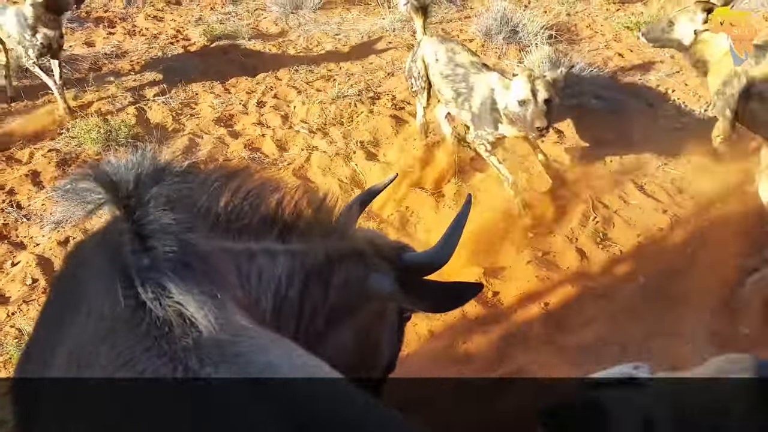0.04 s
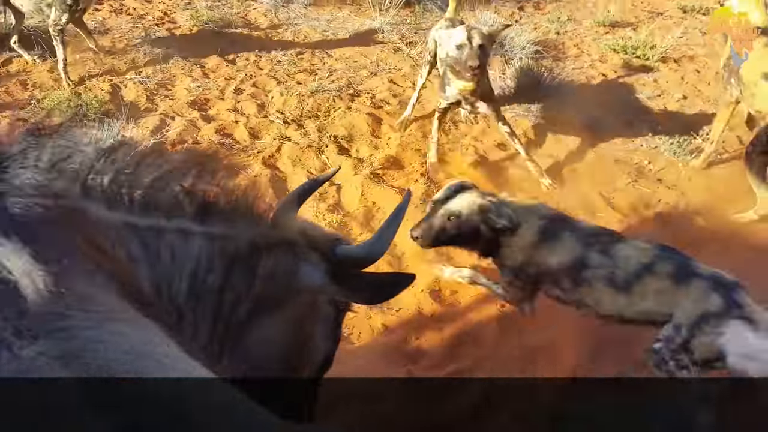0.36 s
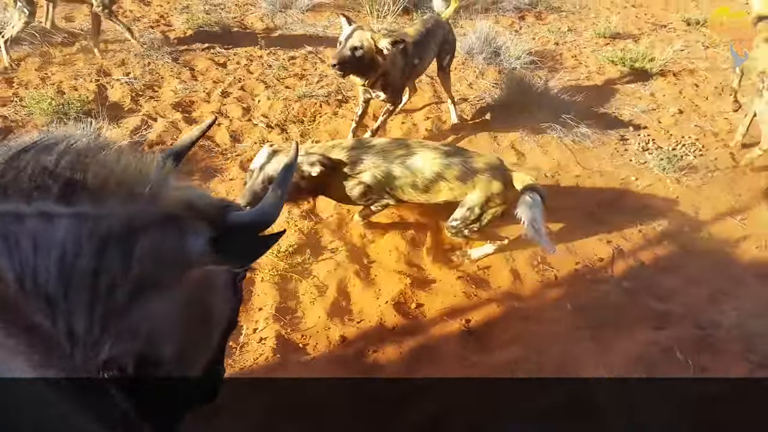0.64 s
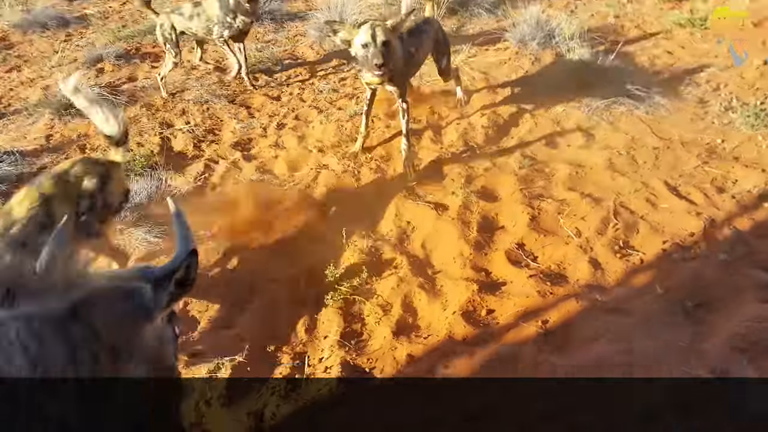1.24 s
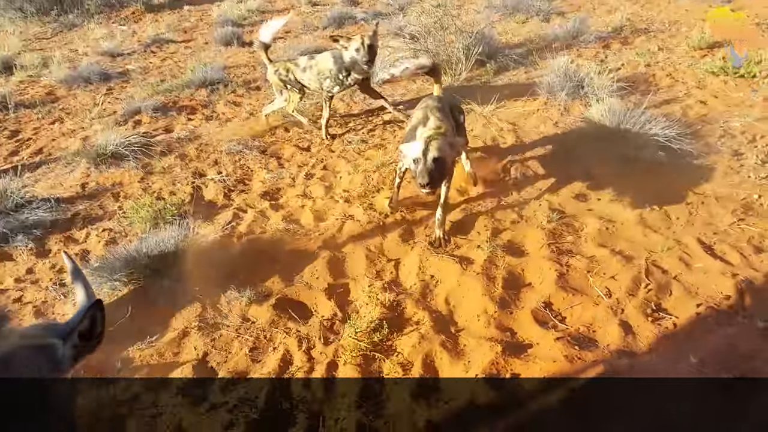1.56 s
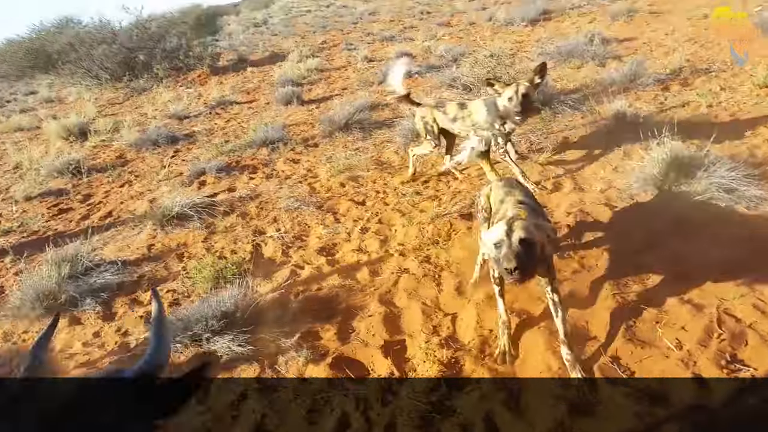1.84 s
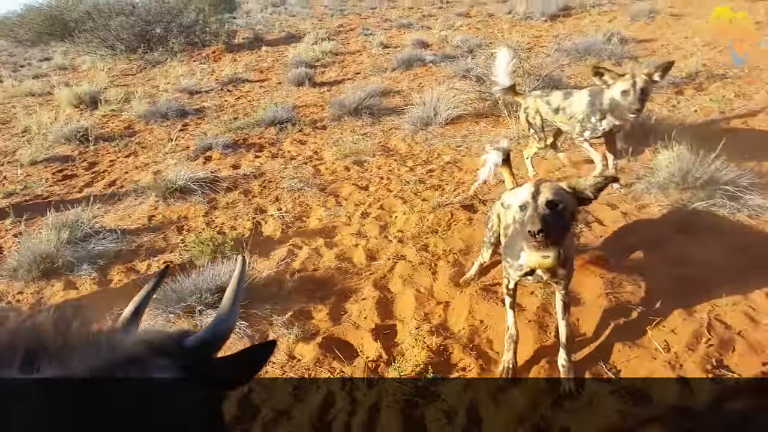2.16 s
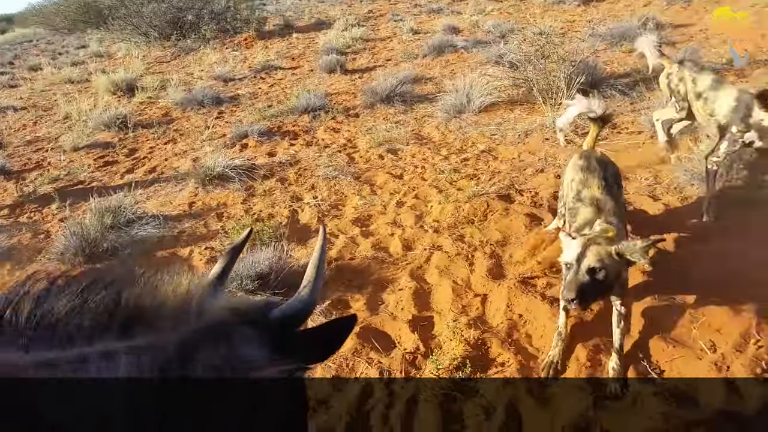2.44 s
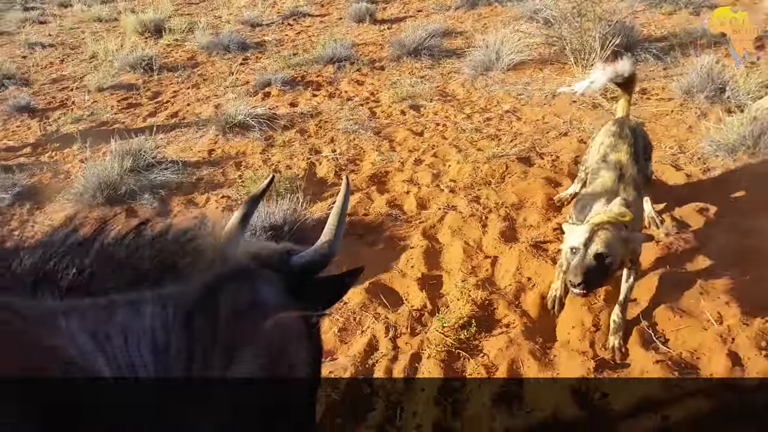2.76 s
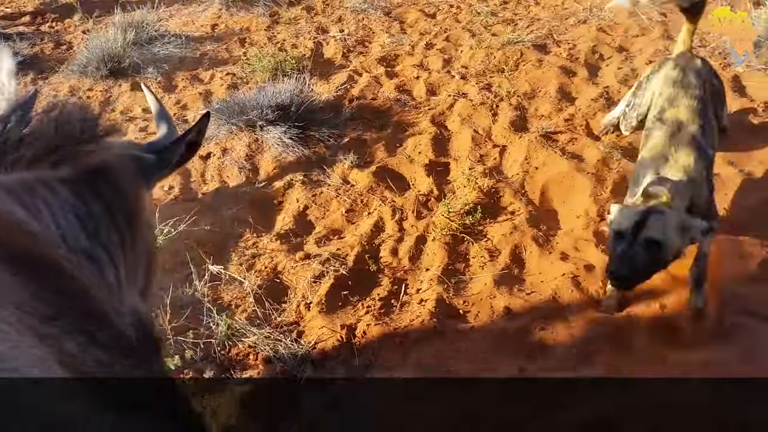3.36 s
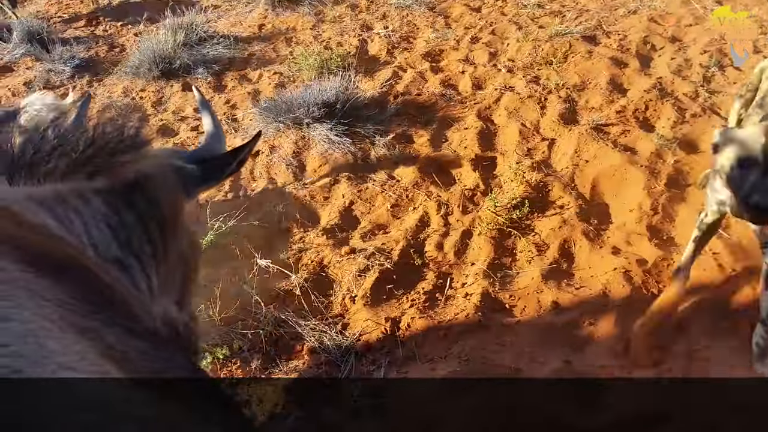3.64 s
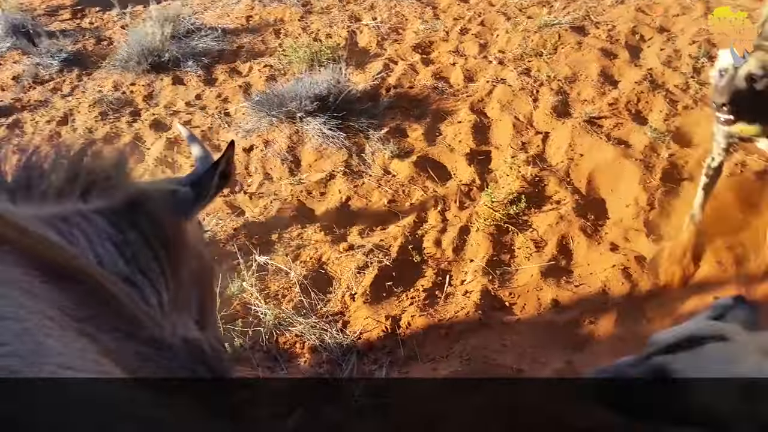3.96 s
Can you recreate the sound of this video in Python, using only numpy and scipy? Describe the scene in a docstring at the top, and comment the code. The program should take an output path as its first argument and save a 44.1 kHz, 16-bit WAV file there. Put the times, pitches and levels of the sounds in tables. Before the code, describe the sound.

Wild dogs twitter close by in rapid, very high squeaks and short yips.

```python
"""On open sand, excited painted dogs twitter close to the microphone.
Each syllable has two voices at once: a whistle that dips, leaps to a very high arch and drops back,
and a short falling yip from the vocal folds. Rattling throat grunts and thin whistles fill the gaps,
other dogs whine farther off, and a faint wind lies under it all."""
import sys
import numpy as np
from scipy import signal
from scipy.fft import rfft, irfft
from scipy.io import wavfile
from scipy.ndimage import uniform_filter1d

SR = 44100
rng = np.random.default_rng(int(sys.argv[2]) if len(sys.argv) > 2 else 0)


def log_audio(samples):
    """Write samples as a 16-bit WAV file to the path given in sys.argv[1]."""
    # one column per channel
    frames = np.atleast_2d(samples).T
    # limit to full scale, then quantise
    limited = np.clip(frames, -1, 1)
    pcm = np.round(limited * 32767).astype(np.int16)
    wavfile.write(sys.argv[1], SR, pcm)


N = 176400

TOP_HZ = 15750  # the recorder's upper limit
FAR_RIGHT_DB, RIGHT_DB = -28, -7  # pan: left level minus right level


def undb(db):
    return 10 ** (np.asarray(db) / 20)


def unit(x):
    return x / np.sqrt(np.mean(x ** 2) + 1e-18)


def wobble(n, hz):
    """A random wander of about plus or minus 1 that turns hz times a second."""
    steps = np.arange(n) * hz / SR
    return 1.2 * np.interp(steps, np.arange(8192), rng.standard_normal(8192))


def colour(x, points):
    """Shape the tone along a (Hz, dB) curve, then set the average power to 1."""
    hz, db = np.array(points).T
    f = np.maximum(np.arange(len(x) // 2 + 1) * SR / len(x), 1)
    return unit(irfft(rfft(x) * undb(np.interp(np.log(f), np.log(hz), db)), len(x)))


def gate(t, length, attack_s, release_s):
    """Fade in, hold, fade out."""
    rise = np.clip(t / attack_s + .5, 0, 1)
    fall = np.clip((length - t) / release_s + .5, 0, 1)
    return np.sin(np.pi / 2 * rise * fall) ** 2


def pan(x, db):
    """Place a sound to the left (positive dB) or right (negative dB)."""
    g = undb(db)
    return np.array([g * x, x]) * np.sqrt(2 / (1 + g ** 2))


def add(out, start, x):
    """Mix x in at a start time in seconds."""
    i = int(round(start * SR))
    a, b = max(i, 0), min(i + x.shape[-1], N)
    if b > a:
        out[..., a:b] += x[..., a - i:b - i]


def span(length):
    """The times of a call, with 10 ms to spare on both sides."""
    return np.arange(-SR // 100, int(length * SR) + SR // 100) / SR


def phase_of(hz):
    return 2 * np.pi * np.cumsum(hz) / SR


# The tone of the wind. Each row: frequency in Hz, relative level in dB.
WIND_TONE = [(15, -29), (25, -15), (82, 16), (970, -6), (1530, -5), (3930, -15.5), (5730, -18),
             (8580, -4.5), (12200, -6), (15500, -34.5)]


def wind(level_db=-51.5, gust_db=1.5):
    """Faint moving air and distant hiss, partly shared by both sides."""
    shared = rng.standard_normal(N)
    air = np.array([colour(shared + 0.5 * rng.standard_normal(N), WIND_TONE) for _ in range(2)])
    return air * undb(level_db + gust_db * wobble(N, 4.47))


# Twitters: a lead-in, a high arch, a tail. Each row: time of the leap in seconds, arch length in
# seconds, arch top in Hz, arch level in dB, arch pan in dB, lead-in length in seconds, its starting
# pitch in Hz, its level in dB, tail length in seconds, tail level in dB.
SYLLABLES = [(0.086, 0.033, 15240, -18.5, 1, 0.019, 8600, -24, 0.043, -26),
             (0.21, 0.037, 14900, -21.5, 10, 0.04, 9000, -22.5, 0.026, -26.5),
             (0.62, 0.029, 14100, -19.5, 6, 0.029, 9500, -24, 0.026, -26.5),
             (0.718, 0.028, 14900, -23.5, 12, 0.039, 8200, -21.5, 0.034, -23),
             (0.783, 0.039, 14200, -28, 6, 0.0086, 7750, -25, 0.0033, -15.5),
             (1.049, 0.04, 15200, -19, 8, 0.032, 7720, -32, 0.0053, -37),
             (1.138, 0.041, 15430, -19.5, 10, 0.017, 7970, -19.5, 0.042, -23.5),
             (1.254, 0.032, 15250, -18, 11, 0.043, 9300, -18, 0.048, -21.5),
             (1.38, 0.046, 13400, -17, 0, 0.036, 9400, -19, 0.021, -30.5),
             (1.591, 0.039, 15170, -16.5, 9, 0.018, 8220, -25, 0.03, -21),
             (1.696, 0.043, 15300, -26, 14, 0.041, 7860, -21, 0.036, -22),
             (1.812, 0.035, 15100, -18, 5, 0.035, 8930, -17.5, 0.014, -25),
             (2.082, 0.036, 15100, -20, 2, 0.017, 8150, -29.5, 0.028, -23.5),
             (2.191, 0.05, 15500, -23.5, 10, 0.039, 9740, -19, 0.02, -22.5),
             (2.305, 0.055, 16400, -24.5, 15, 0.041, 9300, -20, 0.012, -38.5),
             (2.538, 0.041, 15250, -21.5, 10, 0.015, 8530, -25.5, 0.028, -23.5),
             (2.655, 0.039, 14540, -23, 12, 0.041, 9300, -20, 0.025, -22.5),
             (2.769, 0.04, 14960, -18, 10, 0.03, 9060, -19, 0.0089, -25),
             (2.874, 0.039, 15200, -25, 8, 0.009, 8000, -67, 0.0068, -33),
             (2.979, 0.0356, 15750, -20.5, 14, 0.0196, 7730, -18, 0.053, -21),
             (3.091, 0.036, 15800, -26, 17, 0.012, 7300, -25, 0.015, -21),
             (3.207, 0.056, 15300, -19.5, 11, 0.022, 8670, -20.5, 0.011, -30.5),
             (3.341, 0.028, 13800, -30, 6, 0.0086, 8000, -63, 0.011, -35),
             (3.437, 0.036, 15040, -20.5, 14, 0.021, 7960, -19, 0.041, -24),
             (3.544, 0.041, 15500, -22.5, 6, 0.036, 9000, -23, 0.043, -24),
             (3.671, 0.037, 12800, -24.5, -7, 0.028, 8820, -17.5, 0.018, -33),
             (3.778, 0.03, 14000, -26, 6, 0.011, 8000, -33.5, 0.03, -39),
             (3.891, 0.048, 15350, -16.5, 5, 0.016, 8160, -23.5, 0.045, -24),
             (3.994, 0.058, 15200, -20, 1, 0.027, 7380, -20, 0.01, -29)]
# The low throat rumble and breathy hiss that go with a twitter.
# Each row: frequency in Hz, relative level in dB.
RUMBLE_AND_BREATH = [(30, -40), (95, 8.5), (320, 4), (520, -7), (1400, 3), (2500, -4), (4000, -11.5),
                     (6200, -13.5), (7500, 2.5), (10500, -6), (15000, 3.5)]


def twitters(folds, dip_hz=7224, tail_hz=7457, dip_s=0.00678, leap_s=0.00845, shoulder=0.89):
    """A raspy whistle dips, leaps, arches and drops. The yip's vocal folds shake its high part."""
    low, high, effort = np.zeros((2, N)), np.zeros((2, N)), np.zeros(N)
    for leap, arch, top_hz, arch_db, arch_pan, lead, lead_hz, lead_db, tail, tail_db in SYLLABLES:
        t = span(lead + arch + tail) - lead  # zero at the leap
        n = len(t)
        first_half = t < arch / 2
        dip = dip_hz + (lead_hz - dip_hz) * np.clip((-t - dip_s) / max(lead - dip_s, .008), 0, 1) ** 2
        crest = top_hz * (1 - (1 - shoulder) * np.minimum((2 * t / arch - 1) ** 2, 2))
        # 0 on the low note, 1 on the arch
        up = (1 + np.tanh(2 * t / leap_s)) * (1 + np.tanh(2 * (arch - t) / leap_s)) / 4
        hz = np.where(first_half, dip, tail_hz) * (1 - up) + crest * up
        waver = 0.0159 * wobble(n, 820) + .02 * wobble(n, 170)
        arch_jitter = .06 * rng.random() * up * wobble(n, 1500)
        phase = phase_of(hz * (1 + waver + arch_jitter))
        rasp = wobble(n, 1900) * np.sin(phase) + wobble(n, 1800) * np.cos(phase)
        tone = np.sin(phase) + .38 * (.5 + up / 2) * rasp

        fade = np.sqrt(2) * gate(t + lead, lead + arch + tail, 0.003, 0.012)
        flutter = 1.5 * np.tanh(wobble(n, 287.5))
        drop_db = -6.5 * (t > arch / 2)  # quieter on the way down
        low_db = np.where(first_half, lead_db, tail_db) + drop_db * up
        low_level = fade * (1 - up ** 2) * undb(low_db) * unit(undb(6 * flutter))
        high_level = fade * up ** 2 * undb(arch_db + drop_db * (1.5 - up)) * unit(undb(3.5 * flutter))

        octave = low_level * undb(-6.5) * np.sin(2 * phase) * np.clip((9000 - hz) / 1000, 0, 1)
        crack = np.clip(wobble(n, 80), 0, 2) * (1 - up) ** 4  # now and then a lower tone breaks in
        undertone = low_level * undb(-16) * np.sin(phase * 2 / 3) * crack
        low_voice = pan(low_level * tone, FAR_RIGHT_DB) + pan(octave, arch_pan)
        add(low, leap + t[0], low_voice + pan(undertone, RIGHT_DB))
        add(high, leap + t[0], pan(high_level * tone, arch_pan))
        add(effort, leap + t[0], uniform_filter1d(low_level + 0.18 * high_level, size=200))
    rumble_and_breath = np.array([colour(rng.standard_normal(N), RUMBLE_AND_BREATH) for _ in range(2)])
    return low + high * (1 + 2 * undb(-5) * folds) + undb(-9.5) * effort * rumble_and_breath


# Yips. Each row: start in seconds, length in seconds, first and last pitch in Hz, relative level in dB,
# then the levels of the overtones and of the in-between tones, in dB compared with the main tone.
YIP_CALLS = [(0.104, 0.037, 1356, 822, -25.5, -10.5, -12.5), (.985, 0.02, 1383, 1225, -42, 7, -9),
             (0.187, 0.067, 1032, 872, -25, -17.5, -7), (0.269, 0.049, 945, 956, -24.5, -12, -4),
             (0.364, 0.032, 914, 903, -23, -13, -6), (0.677, 0.034, 1003, 930, -23, -34, -21),
             (0.715, 0.037, 1112, 907, -23, -5, -27), (0.789, 0.025, 948, 930, -21, -17.5, -9),
             (1.064, 0.021, 1289, 1065, -21, -4.5, -10), (1.134, 0.041, 1191, 936, -21.5, -7, -6),
             (1.255, 0.038, 1260, 863, -28, 2.5, -3), (1.378, 0.037, 1074, 982, -26, -0.5, -32),
             (1.604, 0.027, 1616, 1154, -28.5, -5, -22), (1.698, 0.048, 1258, 890, -27, -3, -36),
             (1.809, 0.044, 1189, 883, -25.5, -3.5, -22.5), (2.195, 0.039, 1111, 915, -27.5, -3, -19.5),
             (2.306, 0.036, 1340, 980, -24.5, -4.5, -19.5), (2.662, 0.039, 1233, 914, -33, -1.5, -24),
             (2.769, 0.048, 1159, 830, -34.5, -2, -29), (2.865, 0.043, 1130, 1030, -42.5, 1, 9),
             (2.988, 0.028, 1707, 1245, -26, 2.5, -14), (3.077, 0.056, 1300, 837, -25.5, -0.5, -28),
             (3.21, 0.044, 1130, 856, -28, -4, -51), (3.336, 0.031, 1269, 1070, -30, -1, -7),
             (3.435, 0.11, 1069, 1110, -33.5, -5.5, -8), (3.44, 0.038, 1443, 808, -30.5, -0.5, -21),
             (3.545, 0.038, 1025, 930, -17.5, -0.5, -41), (3.668, 0.036, 1090, 1060, -40.5, 7, 10.5),
             (3.779, 0.027, 959, 960, -38, -6, 5), (3.887, 0.01, 1270, 1010, -25, -24, -14),
             (3.912, 0.026, 1338, 880, -28, -4, -27), (3.943, 0.064, 1094, 1030, -29.5, -26, 0.5)]
# A yip's overtones: relative levels in dB at 2, 3, .. times the pitch.
YIP_OVERTONES = [0.5, -3.5, -10.5, -18, -50]
# The in-between tones of a breaking voice: relative levels in dB at 0.5, 1.5, .. times the pitch.
BREAK_TONES = [-4.5, -4.5, -5, -10.5, -22]
# The breath in a yip. Each row: frequency in Hz, relative level in dB.
BREATH_TONE = [(200, -6.5), (600, -31), (1000, -13), (2200, -8.5), (4500, -10), (6500, -27), (9000, -15.5),
               (15000, -14)]


def yips(gain_db=4.5, swell_db=4):
    """Breathy yips, mostly falling, that fray at the end. Also returns the vocal folds' swing."""
    out, folds, breath_level = np.zeros((3, N))
    for start, length, first_hz, last_hz, db, over_db, break_db in YIP_CALLS:
        t = span(length)
        n = len(t)
        broken = min(undb(break_db), .6)  # a breaking voice wavers more
        hz = first_hz + (last_hz - first_hz) * np.clip(t / length, 0, 1.1) ** 2.435
        jitter = 0.005 * (1 + 6 * np.clip(t / length, 0, 1) ** 2) + 0.094 * broken
        phase = phase_of(hz * (1 + jitter * wobble(n, 711) + 0.0193 * wobble(n, 107.2)))
        mouth = undb(swell_db * wobble(n, 58.2))  # overtones swell and fade as the mouth moves
        overtones = sum(undb(level + swell_db * wobble(n, 47)) * (1 - broken / 2) ** k
                        * np.sin((k + 2) * phase) for k, level in enumerate(YIP_OVERTONES))
        between = sum(undb(level + swell_db * wobble(n, 58)) * np.cos((k + .5) * phase)
                      for k, level in enumerate(BREAK_TONES))
        edge = undb(over_db) * mouth * overtones + undb(break_db) * between
        voice = np.sin(phase) + gate(t, length - .003, 0.041, 0.0093) * edge
        fade = gate(t, length, 0.0069, 0.0094)
        flicker_db = (1 + 2 * broken) * wobble(n, 494)
        add(out, start + t[0], voice * fade * undb(db + gain_db + flicker_db))
        add(breath_level, start + t[0], fade * undb(db) * (1 + 1.5 * undb(break_db)))
        add(folds, start + t[0], fade * np.sin(phase))
    breath = undb(-13) * breath_level * colour(rng.standard_normal(N), BREATH_TONE)
    return pan(out + breath, RIGHT_DB), folds


# Grunts. Each row: start in seconds, length in seconds, relative level in dB.
GRUNT_CALLS = [(0.148, 0.031, -32), (0.245, 0.052, -35), (0.317, 0.038, -31.5), (0.612, 0.028, -38),
               (0.655, 0.076, -32), (1.085, 0.041, -25.5), (1.178, 0.016, -26), (1.777, 0.034, -41),
               (3.056, 0.041, -29.5), (3.308, 0.038, -33), (3.905, 0.075, -35.5)]
# The throat's low ring. Each row: frequency in Hz, relative level in dB.
THROAT_TONE = [(40, -99), (100, 9), (190, -6), (290, 3.5), (420, -10), (900, -6), (1600, -11.5),
               (5000, -48)]


def grunts(pulse_hz=112, gain_db=0.5):
    """Slow, uneven pulses ring in the throat and make a low rattle."""
    level = np.zeros(N)
    for start, length, db in GRUNT_CALLS:
        t = span(length)
        add(level, start + t[0], gate(t, length, 0.0064, 0.024) * undb(db + gain_db))
    cycles = np.floor(np.cumsum(pulse_hz * (1 + .17 * wobble(N, 90))) / SR)
    pulses = np.diff(cycles, prepend=0) * undb(5.1 * wobble(N, 120))
    noise = 0.059 * rng.standard_normal(N)
    return pan(level * colour(pulses + noise, THROAT_TONE), db=-2)


# Plain whistles. Each row: start in seconds, length in seconds, first and last pitch in Hz, level in dB.
WHISTLE_CALLS = [(0.15, 0.024, 9900, 8100, -22.5), (0.272, 0.085, 7600, 9350, -30.5),
                 (0.451, 0.04, 6870, 7130, -42.5), (0.52, 0.026, 8200, 4800, -30),
                 (3.364, 0.044, 5300, 4800, -38.5), (1.964, 0.063, 8540, 8860, -45.5),
                 (2.406, 0.023, 6900, 7650, -31), (.94, 0.022, 6840, 9500, -28),
                 (3.15, 0.049, 7930, 8550, -19), (3.612, 0.02, 8900, 9500, -28)]


def whistles():
    """Thin whistles glide between the syllables. Their lower notes also sound an octave up."""
    out = np.zeros((2, N))
    for start, length, first_hz, last_hz, db in WHISTLE_CALLS:
        t = span(length)
        glide = np.sin(np.pi / 2 * np.clip(t / length, 0, 1))
        hz = (first_hz + (last_hz - first_hz) * glide) * (1 + 0.0047 * wobble(len(t), 700))
        phase = phase_of(hz)
        level = gate(t, length, .006, .01) * undb(db + 3 * wobble(len(t), 250))
        octave = undb(1) * np.sin(2 * phase) * (hz < TOP_HZ / 2)
        add(out, start + t[0], pan(level * np.sin(phase), FAR_RIGHT_DB) + pan(level * octave, db=8))
    return out


# Distant whines. Each row: start in seconds, length in seconds, pitch in Hz, relative level in dB.
WHINE_CALLS = [(1.475, 0.03, 795, -50), (1.978, 0.023, 800, -54)]


def whines():
    """Far-off dogs whine on one note. Overtones louder than the lowest tone make it nasal."""
    out = np.zeros(N)
    gains = undb([-9, 5.5, 7.5, 3.5, 2.5])
    for start, length, hz, db in WHINE_CALLS:
        t = span(length)
        phase = phase_of(hz * (1 + 0.0065 * wobble(len(t), 360)))
        voice = sum(gain * np.sin(k * phase) for k, gain in enumerate(gains, 1))
        add(out, start + t[0], voice * gate(t, length, 0.013, 0.017) * undb(db))
    return pan(out, RIGHT_DB)


def ground_echo(x, echo_s=0.22, echo_db=-15, bounce_s=.0035, bounce_db=-19.5):
    """Ground and scrub add one close bounce and a short, weak scatter of echoes."""
    t = np.arange(SR // 2) / SR
    fade = np.exp(-np.log(1000) * t / echo_s) * np.minimum(t / 0.003, 1)
    scatter = rng.standard_normal((2, len(t))) * fade
    scatter /= np.sqrt(np.sum(scatter ** 2, axis=1, keepdims=True))
    blended = x + 0.11 * x[::-1]  # each side gets a little of the other
    out = x + undb(echo_db) * signal.fftconvolve(blended, scatter, axes=1)[:, :N]
    add(out, bounce_s, undb(bounce_db) * x)
    return out


def scene(left_delay_s=.00014):
    """The pack is a little to the right in the open air, so the left side hears it later."""
    yipping, folds = yips()
    left, right = ground_echo(yipping + twitters(folds) + whistles() + whines() + grunts())
    late_left = np.zeros(N)
    add(late_left, left_delay_s, left)
    return np.array([late_left, right]) + wind()


def record(dry):
    """The recorder cuts off the highest treble."""
    return signal.sosfilt(signal.ellip(12, .2, 80, TOP_HZ, fs=SR, output="sos"), dry)


dry = scene()
out = record(dry)
log_audio(out)
```